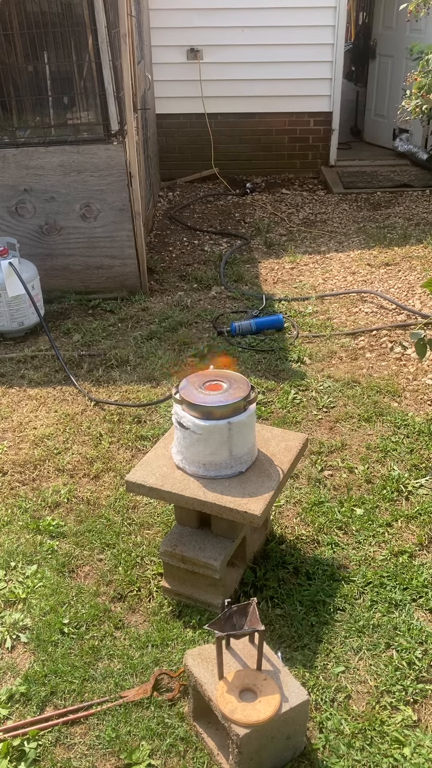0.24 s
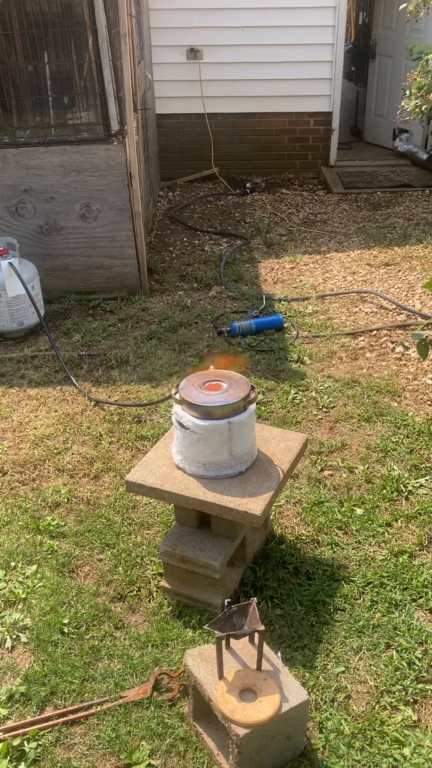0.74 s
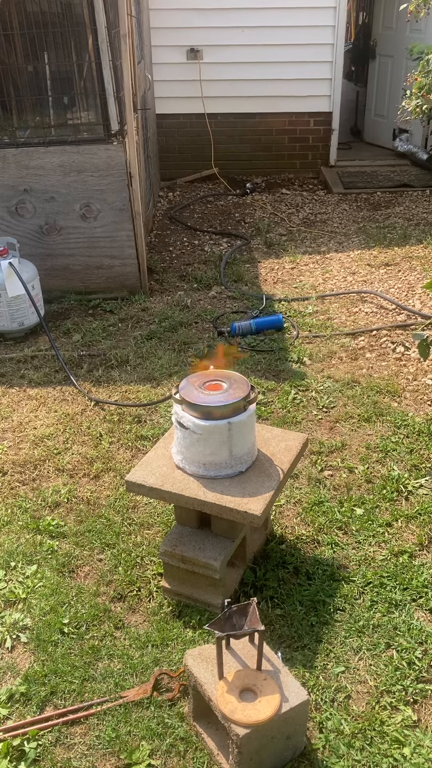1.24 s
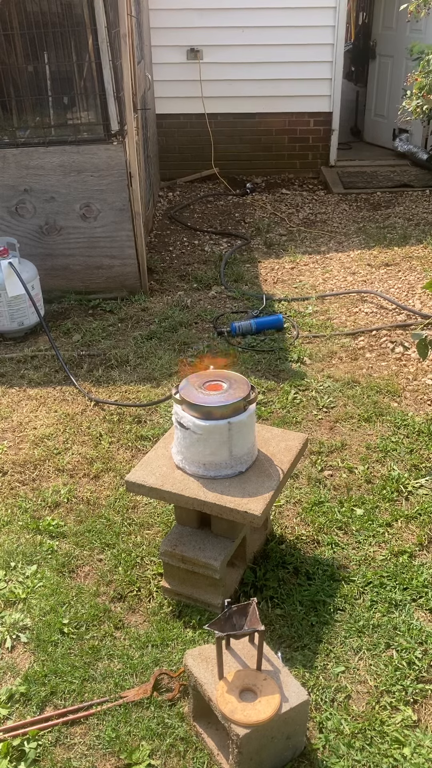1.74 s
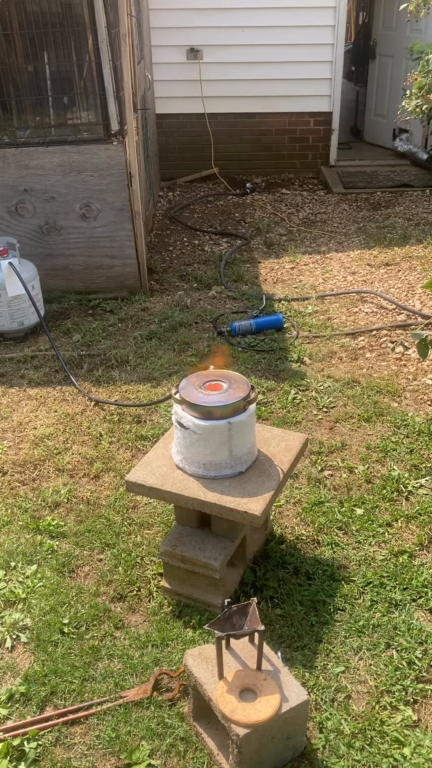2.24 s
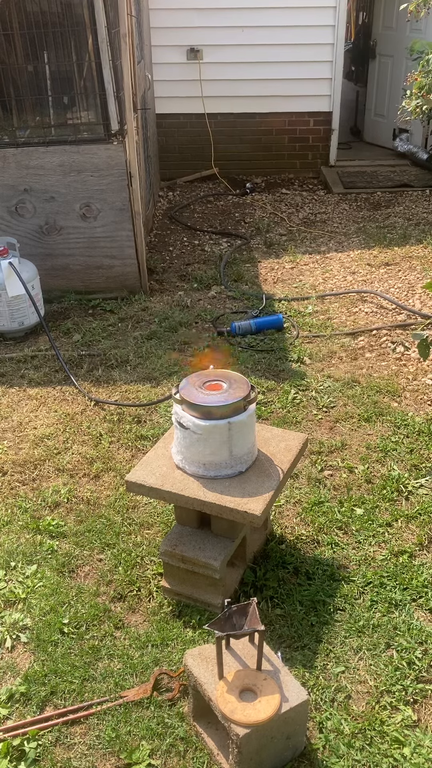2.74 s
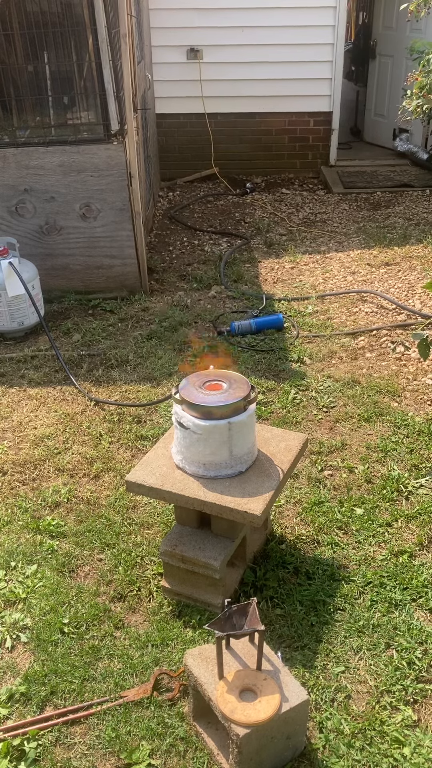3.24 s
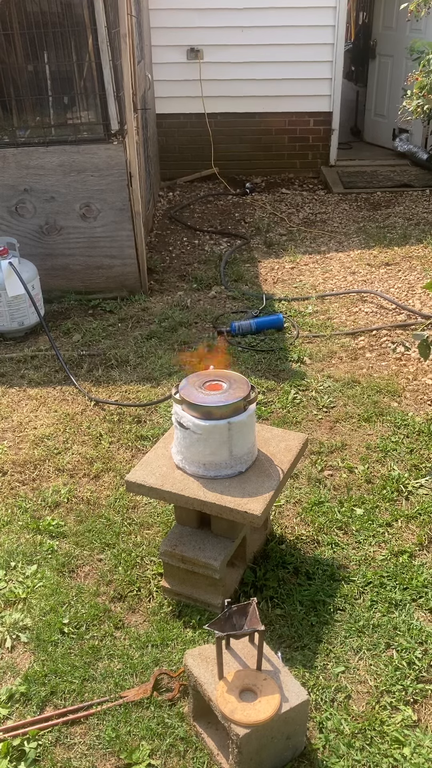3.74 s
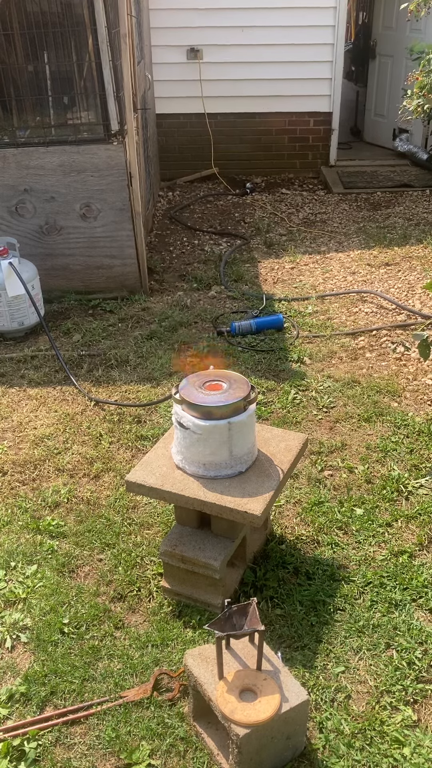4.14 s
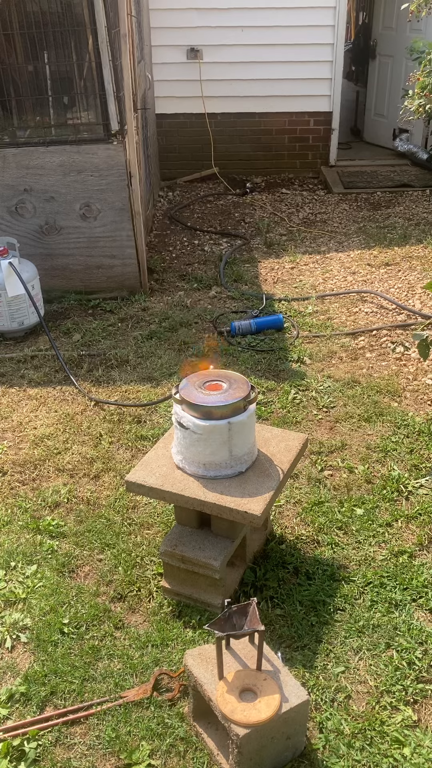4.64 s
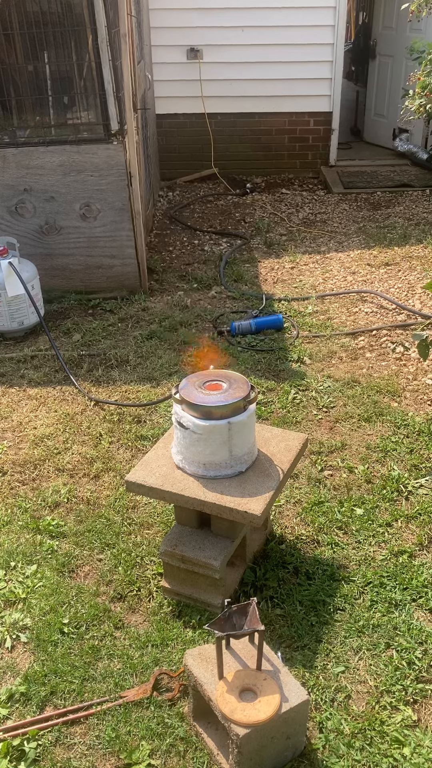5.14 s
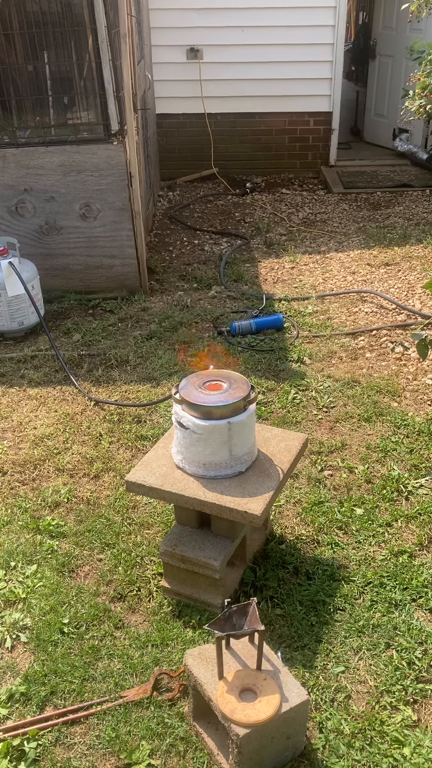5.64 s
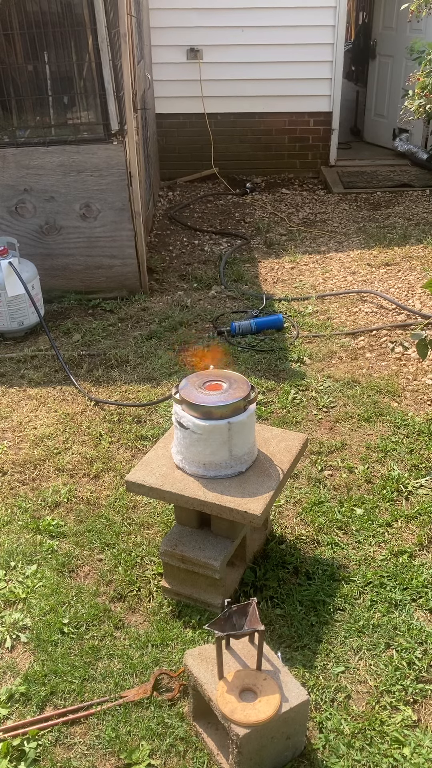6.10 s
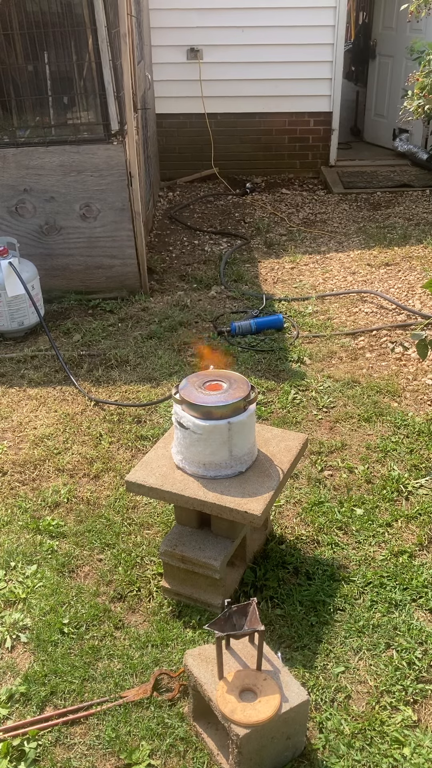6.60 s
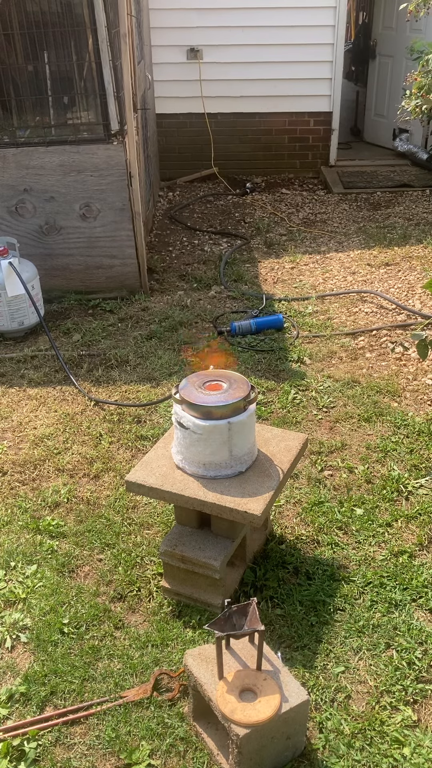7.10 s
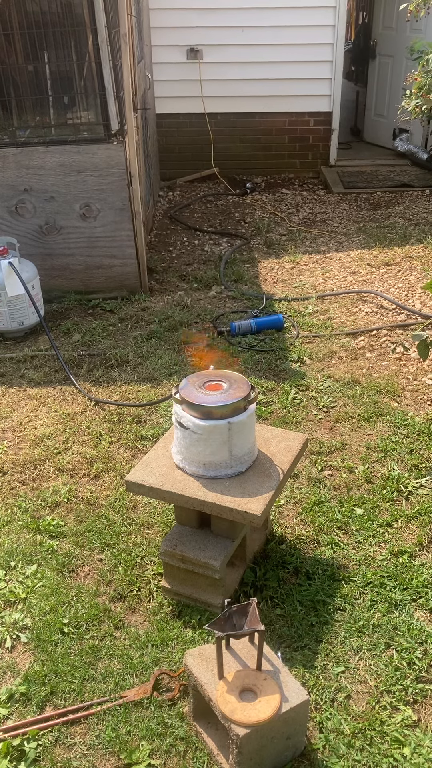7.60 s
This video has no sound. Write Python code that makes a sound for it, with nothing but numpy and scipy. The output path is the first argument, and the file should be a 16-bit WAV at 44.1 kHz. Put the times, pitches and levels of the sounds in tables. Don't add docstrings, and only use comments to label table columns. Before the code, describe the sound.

A gas-fired melting furnace burns steadily a few steps away in a yard, a deep throbbing rumble with irregular soft puffs and a hollow boom. Thin gas hiss and faint whistling sit far beneath it. A tiny tick comes early, a cluster of clinks and a hard knock past the middle, then more knocks and a faint dry-grass rustle near the end. Distant insects and traffic are barely audible. Stereo microphone outdoors, bass heavier on the left.

```python
import sys
import numpy as np
from scipy import signal
from scipy.fft import rfft, irfft, next_fast_len
from scipy.io import wavfile
from scipy.ndimage import uniform_filter1d

SR = 44100
rng = np.random.default_rng(int(sys.argv[2]) if len(sys.argv) > 2 else 0)


def voltage_ratio(level):
    return 10 ** (np.asarray(level, float) / 20)


def master(y):
    cut = np.clip(np.atleast_2d(y).T, -1, 1)
    pcm = np.round(cut * 32767)
    wavfile.write(sys.argv[1], SR, pcm.astype(np.int16))


N = 346626
SECONDS = np.arange(N) / SR
SIZE = next_fast_len(N + 8192)
HZ = np.maximum(np.arange(SIZE // 2 + 1) * SR / SIZE, 1)


def in_time(rows):
    s, values = np.transpose(rows)
    return np.interp(SECONDS, s, values)


def at_hz(points):
    hz, *columns = np.transpose(points)
    return [np.interp(np.log(HZ), np.log(hz), c) for c in columns]


def colour(spectrum):
    inside = (HZ >= spectrum[0][0]) & (HZ <= spectrum[-1][0])
    return voltage_ratio(at_hz(spectrum)[0]) * inside


def resonance(hz, width_hz):
    return 1 / (1 + (2 * (HZ - hz) / width_hz) ** 2)


def filtered(x, gain):
    return irfft(rfft(x, SIZE) * gain, SIZE)[:, :N]


def drift(rate_hz):
    hz = HZ[:SIZE // 64 + 1]
    lowpass = (hz > 1) / (1 + (hz / rate_hz) ** 2)
    slow = irfft(rfft(rng.standard_normal(SIZE // 64 * 2)) * lowpass)
    return np.interp(np.arange(N) / 32, np.arange(len(slow)), slow / slow.std())


def noise(gain, patchy_db, rate_hz, even_s):
    x = filtered(rng.standard_normal((2, SIZE)), gain) * voltage_ratio(patchy_db * drift(rate_hz))
    span = int(even_s * SR)
    power = uniform_filter1d(uniform_filter1d(x ** 2, span), span)
    return x / np.sqrt(power + 1e-20)


def swells(roar, rows, offset_db, rise_s, t60_s, hush):
    t = np.arange(16384) / SR
    rings, busy = np.zeros((2, N + len(t))), np.zeros(N + len(t))
    shape = voltage_ratio(-60 * t / t60_s) * (1 - np.exp(-t / rise_s)) ** 2
    shape /= shape.max()
    phases = rng.uniform(0, 2 * np.pi, (len(rows), 2, 1))
    for (s, db, hz), phase in zip(rows, phases):
        start = round(s * SR)
        rings[:, start:start + len(t)] += voltage_ratio(db + offset_db) * shape * np.sin(2 * np.pi * hz * t + phase)
        busy[start:start + len(t)] += shape * (2 - shape)
    return roar * (1 - hush * np.tanh(1.4 * busy[:N])) + rings[:, :N]


def furnace():
    # time in seconds, boom of the chamber in dB.
    flame = [(0.0, -30), (0.37, -24.5), (1.14, -27), (2.06, -24), (2.19, -30), (2.21, -25.5), (4.16, -27),
             (4.18, -25.5), (4.88, -27.5), (4.97, -25), (5.03, -34.5), (5.08, -26.5), (5.45, -28),
             (6.57, -25), (6.63, -30.5), (6.67, -26.5), (7.75, -25.5), (7.86, -24)]
    # frequency in Hz, density in dB per Hz.
    throb_colour = [(15, -51.5), (25, -25), (70, -1), (86, -7), (125, -6.5), (160, -37.5), (280, -120)]
    drone_colour = [(110, -40.5), (125, -2.5), (180, -3.5), (235, 0), (250, -28.5)]
    boom_colour = [(225, -40.5), (240, -4), (300, 0.5), (355, -5.5), (402, -8.5), (450, -11), (510, -23),
                   (620, -26), (700, -61)]
    # frequency in Hz, width in Hz, dB over the noise between.
    standing_waves = [(79.3, 9, 3.5), (102.4, 19, 2), (143.8, 13, 4.5), (166.7, 6.8, 4.5),
                      (193.5, 9.7, 8.5), (228.1, 9.6, 7.5), (261.6, 18, 7), (299.1, 11, 3.5),
                      (329.5, 24, 0), (355, 18, 5), (392.6, 22, 2.5), (426.6, 20, -6)]
    # start in seconds, peak in dB, pitch in Hz.
    surges = [(0.022, -21.5, 82.2), (0.166, -25, 89.6), (0.425, -25, 95), (0.636, -23, 86),
              (0.723, -26.5, 81.5), (1.001, -26, 85.4), (1.347, -26.5, 91.2), (1.516, -31.5, 86.6),
              (1.825, -26.5, 90.4), (1.969, -27.5, 84), (2.23, -23, 95.8), (2.551, -25.5, 83.6),
              (2.698, -27, 105), (2.955, -26, 72.5), (3.332, -25, 107.9), (3.669, -26.5, 78.5),
              (3.83, -22.5, 83.4), (3.956, -26, 88.2), (4.115, -24, 91), (4.395, -25.5, 95.6),
              (4.675, -22, 88.3), (5.031, -25.5, 88), (5.408, -27.5, 88.8), (5.951, -26, 92.8),
              (6.154, -25.5, 88.9), (6.368, -27, 91.5), (6.465, -26, 85.2), (6.735, -28, 95.3),
              (7.304, -24.5, 101.4), (7.458, -25.5, 96.9)]
    # start in seconds, peak in dB, pitch in Hz.
    puffs = [(0.142, -19, 301), (0.335, -17.5, 305.4), (0.422, -16.5, 380), (0.799, -13.5, 308),
             (0.972, -15, 325.7), (1.106, -18.5, 280.5), (1.612, -25, 264.6), (1.699, -12.5, 310.3),
             (1.797, -17.5, 281.6), (1.981, -16.5, 301.6), (2.123, -15, 251), (2.674, -19.5, 257),
             (2.801, -18.5, 352.4), (2.955, -16.5, 305), (3.27, -13.5, 291.3), (3.332, -11, 310.6),
             (3.548, -18.5, 272.4), (3.698, -16.5, 294.5), (3.823, -16.5, 313), (4.262, -11, 306),
             (4.436, -15, 292), (4.517, -11.5, 307.7), (4.955, -14.5, 296.5), (5.083, -14, 259),
             (5.173, -20.5, 332), (5.342, -17, 297), (5.696, -19, 336), (5.802, -20.5, 287),
             (5.887, -19, 270.6), (6.229, -13, 276), (6.345, -18.5, 355), (6.535, -15.5, 348.6),
             (6.673, -16.5, 264), (6.841, -12.5, 261), (6.993, -16.5, 299.3), (7.235, -15, 264),
             (7.393, -16, 272), (7.558, -16, 341), (7.703, -18.5, 284), (7.832, -11.5, 316)]

    boom_db = in_time(flame)
    swing_db = boom_db - boom_db.mean()
    throb_db = -33.5 - 0.2 * swing_db
    warm_up_db = np.exp(-SECONDS / 0.99)
    drone_db = -31.5 + 0.09 * swing_db + warm_up_db
    standing = 0.72 + sum(voltage_ratio(db) * resonance(hz, width_hz) for hz, width_hz, db in standing_waves)

    throb = voltage_ratio(throb_db) * noise(colour(throb_colour) * standing, patchy_db=0.5, rate_hz=7.5, even_s=0.5)
    drone = voltage_ratio(drone_db) * noise(colour(drone_colour) * standing, patchy_db=-0.5, rate_hz=21, even_s=0.66)
    boom = voltage_ratio(boom_db) * noise(colour(boom_colour) * standing, patchy_db=0.93, rate_hz=60, even_s=0.21)
    tube = swells(throb, surges, offset_db=-3, rise_s=0.015, t60_s=0.31, hush=0.36)
    chamber = swells(boom, puffs, offset_db=-3, rise_s=0.005, t60_s=0.075, hush=0.44)
    roar = tube + drone + chamber

    lowest = filtered(roar, resonance(224, 81))
    return roar - 0.85 * np.exp(-(SECONDS / 0.78) ** 2) * lowest


def ticks():
    # start in seconds, knock in dB, crack in dB, t60 in seconds, snap in dB over the crack.
    bright_ticks = [
        (1.06, -44.5, -46, 0.076, 5),
        (3.691, -45, -62.5, 0.037, 5),
        (4.665, -43.5, -45.5, 0.14, -0.5),
        (4.768, -33, -51, 0.028, 0),
        (4.794, -41, -45, 0.052, -5),
        (6.822, -53, -47.5, 0.082, 4),
        (7.201, -62.5, -60.5, .06, 4),
    ]
    # start in seconds, knock in dB, crack in dB, t60 in seconds.
    dull_ticks = [(1.185, -51.5, -55, 0.08), (4.697, -50, -51, 0.14), (4.83, -68, -46, 0.11),
                  (4.842, -20, -29.5, 0.05), (4.871, -40.5, -40, 0.11), (6.481, -53.5, -49.5, .055),
                  (6.584, -41.5, -45, 0.056), (6.627, -40, -46.5, 0.09), (6.718, -42.5, -56, 0.06),
                  (6.75, -59, -50.5, 0.066), (6.695, -41.5, -64, .05), (6.774, -57.5, -49, 0.036),
                  (6.816, -30, -35.5, 0.16), (6.844, -34, -45, 0.082), (6.886, -53, -46.5, 0.027),
                  (7.275, -47.5, -64, 0.032), (7.406, -45.5, -65, 0.033)]
    dull_snap_db = -29.5

    t = np.arange(8192) / SR
    out = np.zeros((2, N + len(t)))
    band_edges = [(3, [520, 1490]), (5, [1800, 4720]), (3, [5000, 6900])]
    bands = [signal.butter(order, hz, "band", fs=SR, output="sos") for order, hz in band_edges]
    contact = 1.4 * voltage_ratio(-60 * t / 0.0075)
    yard_answer = 0.18 * voltage_ratio(-60 * t / 0.36)
    rise = np.minimum(t / 0.0003, 1)
    rows = bright_ticks + [(*row, dull_snap_db) for row in dull_ticks]
    for s, knock_db, crack_db, t60_s, snap_db in rows:
        start = round(s * SR)
        envelope = (contact + voltage_ratio(-60 * t / t60_s) + yard_answer) * rise
        burst = rng.standard_normal((3, 2, len(t))) * envelope
        burst[2] *= voltage_ratio(-60 * t * 0.6 / t60_s)
        burst[..., 0] += 3.5
        levels_db = knock_db, crack_db, crack_db + snap_db
        for band, level_db, white in zip(bands, levels_db, burst):
            out[:, start:start + len(t)] += voltage_ratio(level_db + 3.5) * signal.sosfilt(band, white)
    return out[:, :N]


def rings():
    # start in seconds, frequency in Hz, peak in dB, t60 in seconds.
    modes = [(1.06, 4000, -50, 0.16), (1.062, 2360, -54, 0.11), (1.085, 3910, -51.5, 0.077),
             (1.185, 1370, -55, 0.086), (4.665, 5110, -42, 0.052), (4.669, 4060, -37, 0.05),
             (4.676, 2380, -45.5, 0.12), (4.697, 2380, -57, 0.14), (4.712, 4020, -54, 0.076),
             (4.769, 3680, -46.5, 0.061), (4.793, 3860, -36.5, 0.054), (4.793, 7150, -50, .05),
             (4.82, 3950, -43, 0.12), (4.842, 596, -28, 0.071), (4.842, 2484, -32, 0.083),
             (4.843, 4700, -28.5, 0.018), (4.852, 4200, -36, 0.084), (4.855, 6600, -56, 0.13),
             (6.588, 3425, -47.5, 0.12), (6.72, 2530, -50, .05), (6.826, 5180, -48, .2),
             (6.774, 1400, -46, 0.23), (6.776, 4070, -47.5, 0.075), (6.819, 1505, -28.5, 0.037),
             (6.817, 1050, -34.5, 0.081), (6.817, 4410, -31.5, 0.05), (6.818, 3675, -38, 0.037),
             (6.825, 2360, -44, 0.1), (6.855, 2540, -49, 0.06), (6.886, 3480, -47.5, 0.11),
             (1.061, 1600, -55, 0.066), (1.061, 2680, -54, .07), (1.061, 5900, -54, 0.067),
             (4.667, 6600, -56, .08), (4.675, 5700, -56, .08), (4.697, 4650, -53, .1),
             (4.735, 3350, -59, .08), (4.769, 6500, -54, 0.057), (4.831, 5300, -57, 0.054),
             (4.843, 1230, -28.5, 0.055), (4.842, 3400, -40, .06), (4.871, 950, -40, 0.049),
             (6.63, 1200, -45, 0.063), (6.633, 3650, -47, .06), (6.664, 1030, -49, 0.1),
             (6.818, 650, -45, 0.049), (6.818, 2950, -55, 0.07), (6.963, 1020, -59, .05),
             (4.842, 783, -31, 0.046), (4.666, 738, -42.5, .07)]
    t = np.arange(8192) / SR
    out = np.zeros((2, N + len(t)))
    rise = np.minimum(t / 0.0012, 1)
    for s, hz, peak_db, t60_s in modes:
        start = round(s * SR)
        rattle = 1 + 0.43 * np.interp(t, np.linspace(0, t[-1], 120), rng.standard_normal(120))
        envelope = voltage_ratio(peak_db - 60 * t / t60_s) * rise * rattle
        detune, phase = rng.uniform(-0.84, 1, (2, 2, 1))
        mode = np.sin(2 * np.pi * hz * t + [[0], [1.5]])
        partner = 0.55 * np.sin(2 * np.pi * hz * (1 + 0.033 * detune) * t + np.pi * phase)
        out[:, start:start + len(t)] += envelope * (mode + partner)
    return out[:, :N]


def rustles():
    # loudest moment in seconds, level in dB, rise in seconds, fall in seconds.
    moments = [
        (1.269, -53, 0.071, 0.1),
        (5.704, -55.5, 0.043, 0.048),
        (6.64, -57.5, 0.25, 0.43),
    ]
    # first resonance in Hz, second in Hz, width in Hz.
    colours = [
        (1870, 3230, 1000),
        (3800, 6100, 2500),
        (1800, 4900, 5200),
    ]
    out = np.zeros((2, N))
    for (s, db, rise_s, fall_s), (first_hz, second_hz, width_hz) in zip(moments, colours):
        unevenness_db = 1.4 * rng.exponential(1, N) + 1.4 * drift(60)
        clicks = rng.standard_normal((2, N)) * voltage_ratio(unevenness_db)
        t = SECONDS - s
        away = np.where(t < 0, -t / rise_s, t / fall_s)
        level_db = db - 9.5 * np.minimum(away, 4) ** 2
        body = (resonance(first_hz, width_hz) + resonance(second_hz, width_hz)) ** 2
        out += filtered(clicks / clicks.std() * voltage_ratio(level_db), body / np.sqrt(np.mean(body ** 2)))
    return out


def gas_jet():
    # frequency in Hz, density in dB per Hz.
    jet_colour = [(1060, -32), (1800, -7.5), (1970, -2.5), (2160, -3), (2340, -5), (2580, 1), (2910, -4),
                  (3170, 0.5), (3500, -1), (3550, -5.5), (3790, 0.5), (4540, -2), (4900, -15.5),
                  (6370, -39), (10800, -120)]
    return voltage_ratio(-62.5) * noise(colour(jet_colour), patchy_db=1.16, rate_hz=13, even_s=0.25)


def whistles():
    # frequency in Hz, level in dB rms, width in Hz.
    lines = [(1020, -66, 130), (1243, -76.5, 62), (1400, -72, 40), (2190, -74, 34), (2360, -76.5, 52),
             (2520, -73.5, 37), (2640, -77, 30), (3100, -74.5, 25), (3770, -78.5, 20), (3920, -78, 22),
             (4110, -75.5, 45), (4472, -81, 50)]
    gain = sum(voltage_ratio(db) * resonance(hz, width_hz) / np.sqrt(width_hz) for hz, db, width_hz in lines)
    total = np.linalg.norm(voltage_ratio(np.array(lines)[:, 1]))
    breathy = total * noise(gain, patchy_db=3, rate_hz=2.2, even_s=0.8)
    pipe_db = -72 + 1.8 * drift(1.6) - 5.5 * np.exp(-SECONDS / 2.8)
    wobble = 0.7 * np.array([drift(8.4), drift(4.2)])
    return breathy + np.sqrt(2) * voltage_ratio(pipe_db) * np.sin(2 * np.pi * 3656 * SECONDS + wobble)


def insects():
    # frequency in Hz, density in dB per Hz.
    chorus_colour = [(2760, -28), (4700, -6), (4910, -4), (5660, -8), (6020, -7.5), (7830, -34),
                     (13200, -120)]
    first_crest_s, period_s, rising_share = 0.52, 1.21, 0.65
    turn = ((SECONDS - first_crest_s) / period_s) % 1
    level_db = -76.5 + 6 * np.interp(turn, [0, 1 - rising_share, 1], [1, 0, 1])
    return voltage_ratio(level_db) * noise(colour(chorus_colour), patchy_db=1.1, rate_hz=15, even_s=0.3)


def traffic():
    # frequency in Hz, density in dB per Hz.
    road_colour = [(280, -30.5), (480, 2.5), (510, -6), (581, -9), (624, -12), (663, -6), (971, -18.5),
                   (1060, -11), (1180, -19), (1790, -18.5), (2000, -26.5), (2600, -54), (4400, -120)]
    # time in seconds, level in dB.
    approach = [
        (0, -54),
        (2.2, -52.5),
        (4.8, -52.5),
        (5.8, -49),
        (6.8, -48.5),
        (7.2, -51),
        (7.86, -48),
    ]
    return voltage_ratio(in_time(approach)) * noise(colour(road_colour), patchy_db=1.55, rate_hz=20, even_s=0.39)


def self_noise():
    # frequency in Hz, density in dB per Hz.
    hiss_colour = [(6200, -15), (6900, 3.5), (7600, -3), (9800, -3.5), (10500, -8), (11400, -6.5),
                   (11550, -26.5), (12350, -27), (12450, -8.5), (13300, -9), (14400, -7)]
    return voltage_ratio(-88.5) * noise(colour(hiss_colour), patchy_db=1.3, rate_hz=30, even_s=0.3)


def ports(direct, diffuse, focus):
    # frequency in Hz, left minus right in dB, left's lead in radians, likeness from 0 to 1.
    differences = [(30, 2, .1, .96), (100, 2, .2, .98), (170, 2.5, .33, .99), (250, 4.8, .52, .995),
                   (300, 6.5, .65, .995), (400, 11, .92, .95), (490, 10.5, 1.6, .15), (600, 8, 3.9, .75),
                   (760, 1.2, 4.2, .82), (1800, 0, 4.6, .85), (2800, .4, 4.05, .82), (3550, 1.5, 4.5, .45),
                   (4200, .3, 6.0, .76), (4700, .2, 6.5, .7), (5400, .6, 6.7, .35), (7000, .3, 6.28, .8),
                   (9000, .3, 6.28, .94), (10500, 1, 7.5, .5), (14000, 0, 6.28, .9)]
    balance_db, lead, alike = at_hz(differences)
    alike = 1 - (1 - alike) * (1 - focus)
    right = voltage_ratio(-balance_db)
    mean = np.sqrt(1 + right ** 2 + 2 * right * alike * np.cos(lead)) / 2
    margin = 2048
    padded = np.pad([direct, diffuse], [(0, 0), (margin, margin)], "reflect", reflect_type="odd")
    a, b = rfft(padded, SIZE)
    right_port = right * (alike * a * np.exp(-1j * lead) + np.sqrt(1 - alike ** 2) * b)
    return irfft(np.array([a, right_port]) / mean, SIZE)[:, margin:margin + N]


def scene():
    far = furnace() + gas_jet() + whistles() + insects() + traffic() + self_noise()
    near_lowpass = signal.butter(4, 4900, fs=SR, output="sos")
    near = signal.sosfilt(near_lowpass, ticks() + rings() + rustles())
    return ports(*far, focus=0) + ports(*near, focus=0.77)


def band_limit(x):
    return signal.sosfilt(signal.butter(12, 14450, fs=SR, output="sos"), x)


def record(dry):
    n = np.arange(N)
    image = voltage_ratio(-64.5) * dry * np.cos(np.pi / 2 * n)
    to_end = np.minimum(n, N - n)
    fade = np.sin(np.pi / 2 * np.minimum(to_end / 200, 1)) ** 2
    return band_limit((dry + image) * fade)


dry = scene()
out = record(dry)
master(out)
```